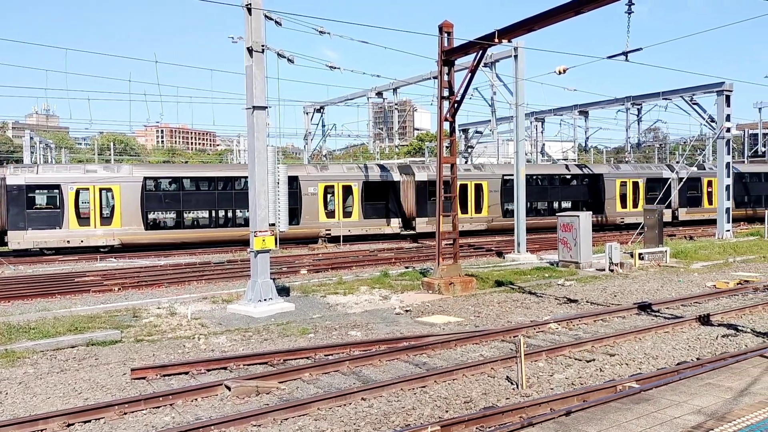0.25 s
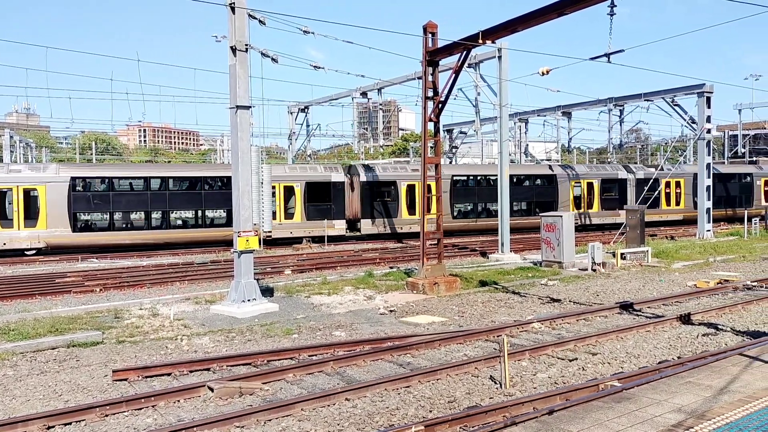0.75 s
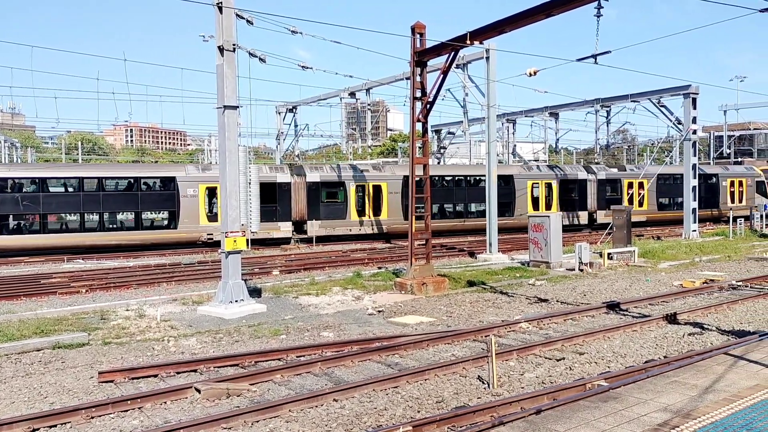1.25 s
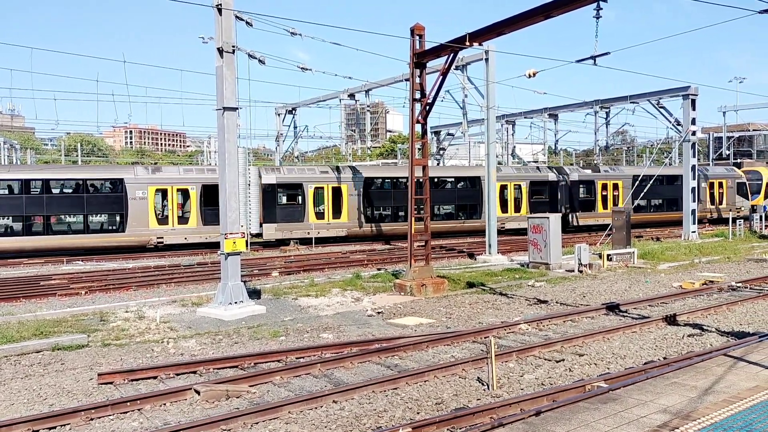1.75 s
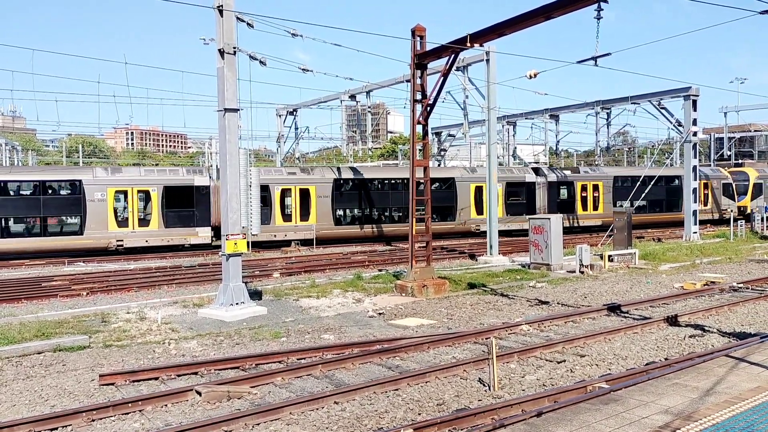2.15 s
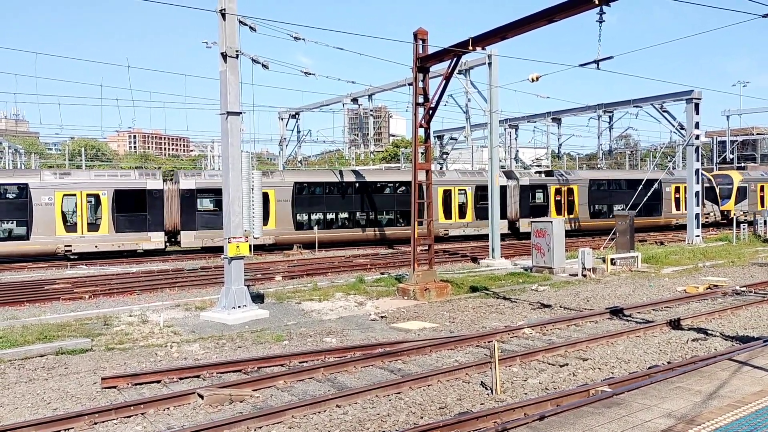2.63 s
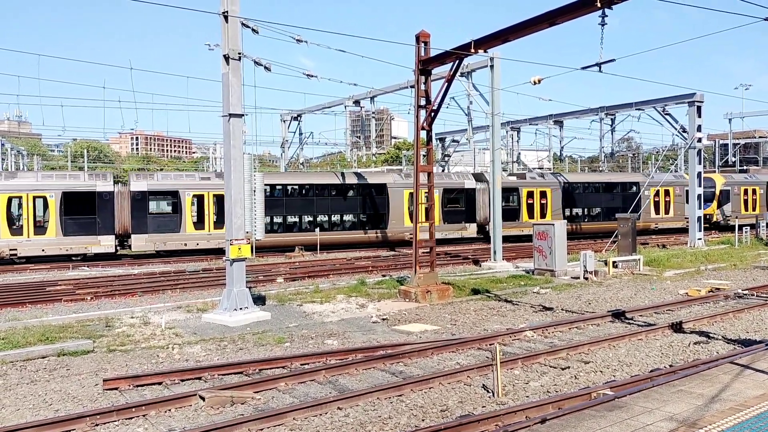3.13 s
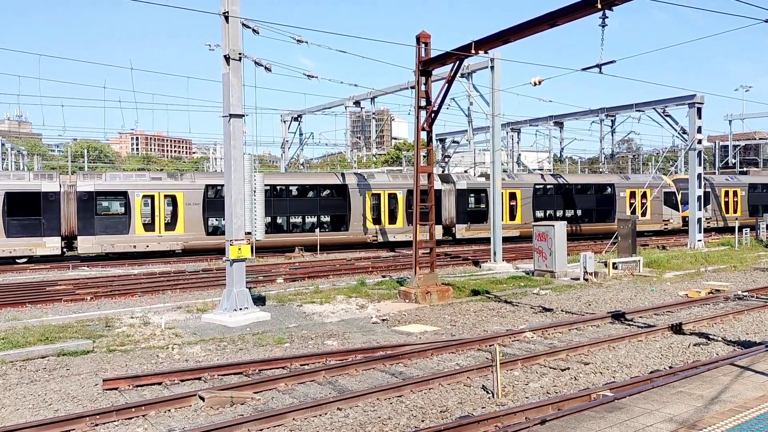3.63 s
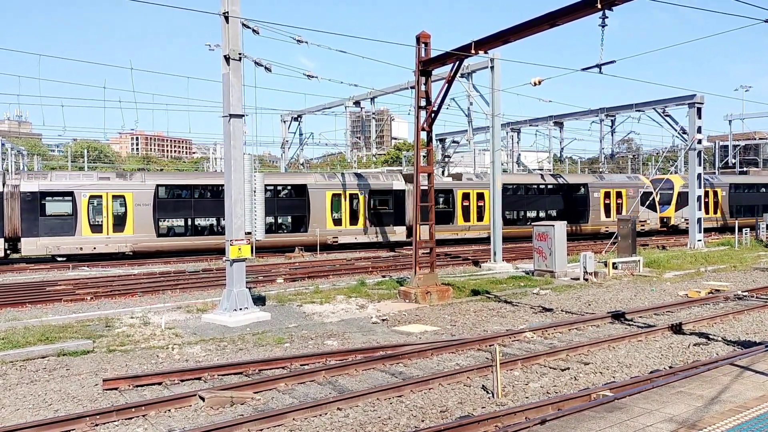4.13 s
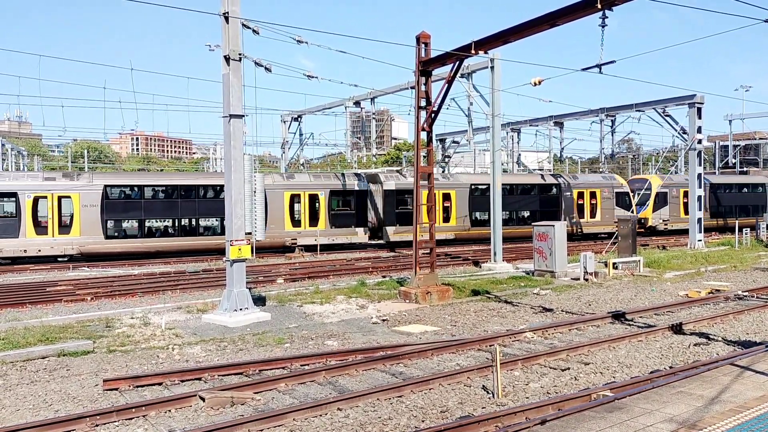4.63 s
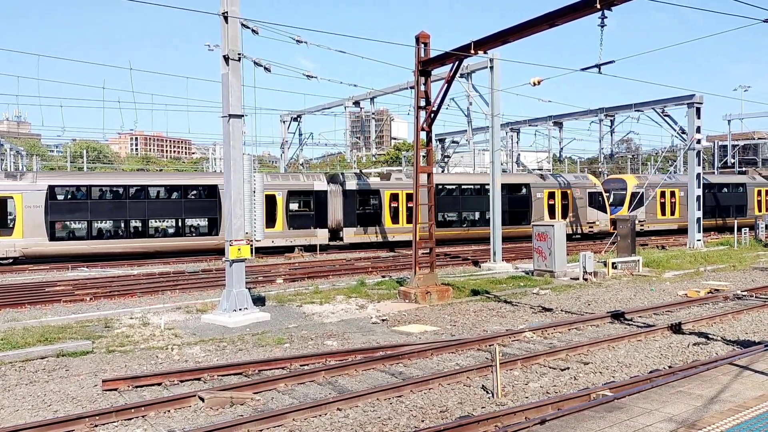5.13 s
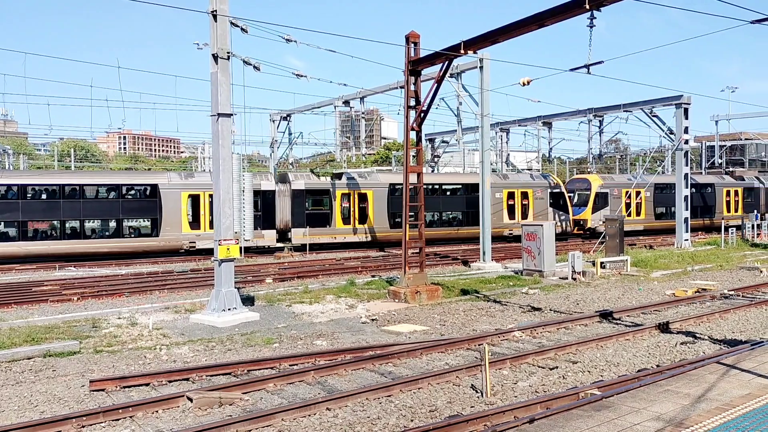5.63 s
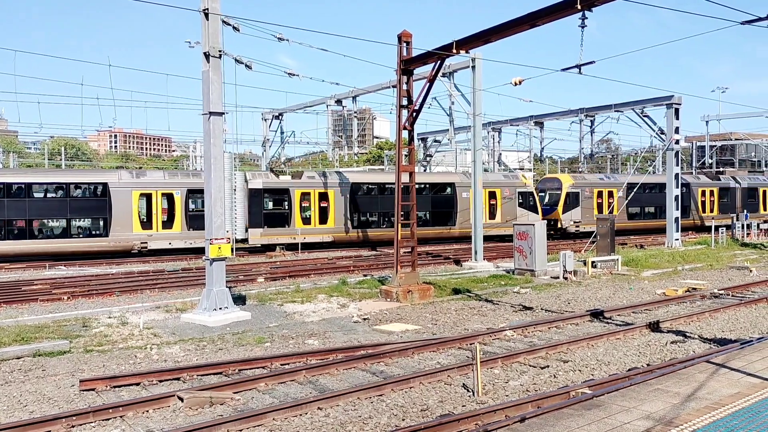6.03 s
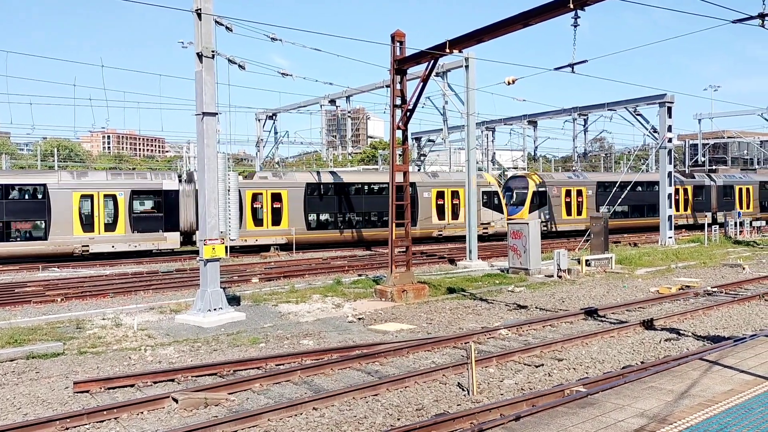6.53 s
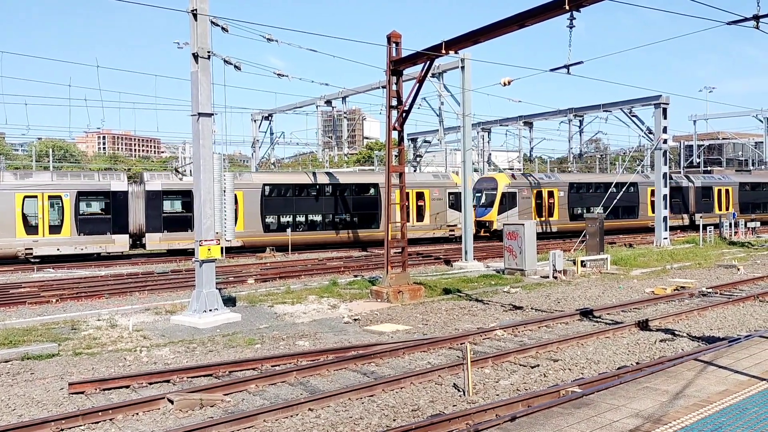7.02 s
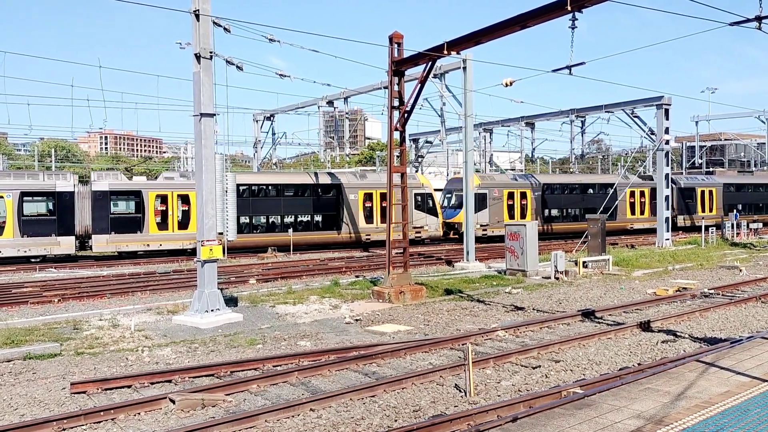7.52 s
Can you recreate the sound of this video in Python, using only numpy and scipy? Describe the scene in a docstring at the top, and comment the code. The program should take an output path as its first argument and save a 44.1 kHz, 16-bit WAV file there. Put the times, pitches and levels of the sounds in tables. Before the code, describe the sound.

Piercing metallic wheel squeals come and go over the low rumble and dull joint thumps of an electric train crossing a rail yard.

```python
"""Two wheels of an electric train squeal in turn through the curves of a rail yard, some way off.
Each squeal is a set of wandering stick-slip modes, some locking on louder and purer for a moment.
Flanges grind in shaped noise; a low moan and hum, and short gliding groans, come from wheel and cars.
Underneath, band-shaped noise rumbles and thumps over rail joints.
Close by, gusts of low noise buffet mostly the left microphone."""
import sys
import numpy as np
from scipy import signal
from scipy.io import wavfile
from scipy.ndimage import uniform_filter1d, minimum_filter1d

SR = 44100
rng = np.random.default_rng(int(sys.argv[2]) if len(sys.argv) > 2 else 0)


def inscribe(sig):
    """Save sig as 16-bit PCM at rate SR to the path in sys.argv[1].

    A 1-D sig is mono; a 2-D sig holds one channel per row.
    Samples are clipped to [-1, 1] before scaling.
    """
    pcm = np.round(np.clip(np.atleast_2d(sig).T, -1, 1) * 32767)
    wavfile.write(sys.argv[1], SR, pcm.astype(np.int16))


N = 342657
TIME = np.arange(N) / SR
CONTROL_TIME = TIME[::32]  # coarser clock for slow envelopes
EDGE_HZ = 15750  # upper band limit at the microphones

# Pitches of each wheel's leading modes. Each entry: frequency in Hz.
FIRST_HZ = [3187, 4026, 4886, 5744, 6627, 9344]
SECOND_HZ = [4223, 5127, 6043, 6957, 7879, 10657]
# Share of each leading mode in its wheel's squeal. Each entry: relative level in dB.
FIRST_SHARE_DB = [-9.5, 2, 1, -1, 3.5, -15.5]
SECOND_SHARE_DB = [4, 1.5, -1.5, -5, -10.5, -14]
# Sound of the leading modes.
# Each row: line width in Hz before the skirt, roughness 0-1 when not locked, left-right balance in dB.
FIRST_LEAD = [(15.5, 0.84, -6), (8.4, 0.49, -5.5), (42.6, 0.8, -10), (34, 0.95, -8), (5.3, 0.73, -8),
              (8.25, 0.4, 5)]
SECOND_LEAD = [(21.8, 0.81, -3.5), (31.7, 0.97, -7), (34, 1, -10), (13.7, 0.41, -14), (11.6, 0.4, -26),
               (14, 0.41, -5)]
# Pitches of each wheel's weaker modes. Each entry: frequency in Hz.
FIRST_WEAK_HZ = [656, 865, 1694, 2374, 6400, 7520, 8425, 10285, 11213, 12102, 13103, 14018, 15003]
SECOND_WEAK_HZ = [2178, 2468, 3328, 6440, 8806, 9727, 11590, 12500, 13437, 14320, 14928, 15601]
# Sound of the weaker modes.
# Each row: line width in Hz before the skirt, relative level in dB, left-right balance in dB.
FIRST_WEAK = [(57.407, -25, -2), (64, -7.5, -5.5), (99.3, -6, -2.5), (44, -6, 3), (70, -8.5, -20),
              (11.4, -3.5, -32), (20, -12, 35), (24.3, -8.5, -13), (30, -14, 1), (30, -24, 2), (28, -42, 8),
              (30, -29, 10), (25, -29, 16)]
SECOND_WEAK = [(110, -8, 0), (40, -5, 0), (39.4, 0, 1), (70, -8, -21), (13.7, -11, 36), (14.2, -6.5, 3),
               (28, -20.5, 6), (25, -40, -2), (22, -35, 4), (30, -24, 17), (45, -21, 22), (35, -42, 24)]
# Each wheel's flange pressing on the rail. Each row: start in seconds, length in seconds, rise in seconds,
# squeal in dB, grind in dB, then low rasp and top fizz in dB against the grind; levels are relative.
FIRST_CONTACTS = [(-.1, 0.047, .03, -23.5, -22.5, -24, -12), (0.367, 0.049, .06, -52, -39.5, -8, -6),
                  (0.827, 0.28, 0.017, -29.5, -28.5, 1.5, 6.5), (1.374, 0.27, 0.065, -29, -29.5, 5.5, 12.5),
                  (1.964, 0.012, 0.012, -42.5, -34, -2.5, 7.5), (2.044, 0.047, .02, -36, -44, 2, 16),
                  (2.092, 0.017, 0.017, -29.5, -27.5, 4, 6), (2.186, 0.065, 0.061, -29.5, -24.5, 0.5, 1.5),
                  (2.56, .19, 0.13, -35.5, -34, 8.5, 3)]
SECOND_CONTACTS = [(2.45, 0.19, 0.054, -42.5, -32, -0.5, 6), (2.5, 0.23, 0.12, -30.5, -27.5, 3, 7.5),
                   (2.796, 0.16, 0.066, -36.5, -35.5, -4, 5), (3.034, 0.64, 0.19, -36, -31.5, 5.5, 4),
                   (3.468, .56, 0.19, -25.5, -20.5, -1.5, -2.5),
                   (4.068, 0.18, 0.054, -27, -22.5, -8.5, 2.5),
                   (4.343, 0.079, 0.06, -33.5, -26.5, -2.5, -3), (4.745, 0.63, 0.1, -25.5, -20.5, -2, 3),
                   (5.272, 0.45, 0.036, -22.5, -23.5, -4.5, 4), (5.755, 0.26, 0.023, -30, -27, 1.5, 2.5),
                   (6.056, 0.86, 0.1, -26.5, -24, -0.5, 0.5), (6.852, 1, .08, -32, -29.5, 4.5, 4)]
# One mode captures the stick-slip and sings out.
# Each row: start in seconds, length in seconds, mode in Hz, relative level in dB.
FIRST_LOCKS = [(-.1, 0.079, 4886, -21), (-.1, 0.14, 4026, -27.5), (.41, 0.08, 4886, -43),
               (0.824, 0.061, 3187, -26.5), (0.938, 0.17, 3187, -24), (0.93, 0.3, 4886, -25.5),
               (1.052, 0.049, 6627, -20), (1.388, 0.15, 3187, -25.5), (1.56, .15, 3187, -31),
               (1.484, 0.098, 6627, -17), (1.648, 0.071, 6627, -20), (1.507, .09, 9344, -31),
               (1.618, 0.059, 4026, -19.5), (2.092, 0.037, 3187, -25), (2.102, 0.26, 5744, -34),
               (2.204, .11, 4026, -28), (2.57, 0.14, 3187, -33.5), (2.715, 0.053, 4886, -27)]
SECOND_LOCKS = [(2.55, 0.26, 6043, -33), (2.577, 0.16, 4223, -38), (2.689, 0.06, 4223, -19.5),
                (2.852, 0.095, 4223, -30), (3.228, 0.32, 10657, -34.5), (3.144, 0.19, 4223, -30.5),
                (3.346, 0.24, 4223, -23), (3.598, 0.11, 4223, -22), (3.614, 0.39, 10657, -33),
                (3.7, 0.091, 6957, -34), (3.76, 0.46, 5127, -33), (3.8, 0.26, 4223, -21),
                (4.113, 0.23, 6957, -29), (4.142, 0.056, 6043, -20), (4.186, 0.15, 5127, -23),
                (4.455, 0.091, 6957, -39.5), (4.78, .1, 7879, -27.5), (4.785, 0.44, 6957, -21),
                (4.818, 0.25, 4223, -30), (4.973, 0.27, 4223, -25.5), (5.316, .15, 10657, -30),
                (5.34, .12, 5127, -23), (5.53, 0.093, 6043, -23.5), (5.635, 0.17, 4223, -22),
                (5.645, 0.28, 6957, -24), (6.195, .13, 4223, -25), (6.196, 0.63, 5127, -26),
                (6.502, 0.098, 6043, -23), (6.923, 0.4, 4223, -24.5), (6.85, 0.56, 10657, -43.5),
                (6.9, .2, 5127, -38), (7.323, 0.1, 5127, -27), (7.486, 0.053, 4223, -18)]
# The second wheel's lowest modes.
# Each row: frequency in Hz, line width in Hz before the skirt, roughness 0-1, left-right balance in dB.
MOAN_MODES = [(640, 44.6, 0.4, -3), (900, 43, 1, -3.5), (1786, 27.9, 1, -2.5)]
# Share of those lowest modes in the squeal. Each entry: relative level in dB.
MOAN_SHARE_DB = [-31.5, -16, -14.5]
# Side load flexing the second wheel's disc.
# Each row: centre in seconds, half length in seconds, then level in dB of each of the lowest modes.
SIDE_LOADS = [(3.97, 0.18, -38.5, -33, -48), (6.55, 0.92, -68, -61, -37.5)]
# Lead of the squeal and grinding at the left microphone over the right.
# Each row: time in seconds, lead in milliseconds.
LEAD_TIME = [(0, .35), (1.8, 0.47), (3.7, 0.48), (4.2, 0.39), (6, 0.375), (6.7, 0.46)]
# Colour of the grinding. Each row: frequency in Hz, relative density in dB per Hz.
GRIND_COLOUR = [(400, -23), (650, -20), (780, -8), (910, -4), (1100, -6.5), (1500, -7), (1900, -3.5),
                (3500, -1.5), (4700, 3.5), (6600, 0.5), (7500, -8), (9000, -17.5), (13000, -25),
                (15500, -42)]
# Place of the grinding between the microphones. Each row: frequency in Hz, left-right balance in dB.
GRIND_SIDE = [(900, -3), (2400, 1), (3400, -18.5), (4700, -16), (6600, -1), (8200, 1), (12500, -1.5),
              (14500, 23)]
# Colour of the rolling. Each row: frequency in Hz, relative density in dB per Hz.
ROLL_COLOUR = [(15, -26), (30, -17.5), (42, 4.5), (70, -6.5), (100, -0.5), (160, -8), (270, -9), (330, -18),
               (520, -27.5), (640, -21.5), (900, -26), (1300, -34.5), (3000, -38.5), (9000, -58.5)]
# Wheels dropping over rail joints. Each row: time in seconds, relative strength in dB.
JOINTS = [(0.317, -18), (1.124, -18.5), (1.188, -11), (1.68, -13), (2.469, -33), (2.545, -11),
          (3.045, -12.5), (5.447, -15), (5.966, -16), (6.764, -26), (6.841, -17), (7.349, -16.5)]
# Stray groans and squeaks from the cars.
# Each row: start in seconds, length in seconds, first pitch in Hz, last pitch in Hz (both before the
# waver), level in dB.
GROANS = [(0.544, 0.084, 4400, 4360, -52), (0.547, 0.056, 2360, 2340, -49), (0.676, 0.16, 2230, 1900, -51),
          (2.818, 0.3, 491, 454, -46), (3.346, 0.26, 210, 205, -33), (3.828, 0.21, 332, 317, -38.5),
          (7.624, 0.46, 215, 202, -29.5)]
# Gusts, strongest at the left microphone. Each row: centre in seconds, length in seconds, relative level in dB.
GUSTS = [(3.933, 0.17, -24), (4.095, 0.087, -15.5), (4.187, 0.051, -5.5), (4.282, 0.046, -6),
         (4.42, 0.16, -18.5), (4.9, 0.25, -21.5), (5.55, 0.64, -20.5), (5.729, 0.03, -12),
         (6.203, 0.25, -30)]
# Colour of the gusts. Each row: frequency in Hz, relative density in dB per Hz.
GUST_COLOUR = [(15, -9), (45, 5), (80, 2.5), (140, -1.5), (220, -10.5), (450, -31), (1200, -67),
               (4000, -85)]
# Likeness of the noise at the two microphones. Each row: frequency in Hz, likeness 0-1.
LIKENESS = [(40, 0.98), (250, 0.95), (600, 0.43), (3000, 0.77), (12000, 0.28)]

LOW_MODE_HZ = 3000  # weaker modes below this answer to the rasp of a contact
# how fast things die away once the flange lets go
RING_DB_PER_S, LOCK_DB_PER_S, GRIND_DB_PER_S, FIZZ_DB_PER_S = 60, 126, 90, 131
# relative levels of the treads' light scraping between contacts
SCRAPE_DB, SCRAPE_RASP_DB, SCRAPE_FIZZ_DB = -46.5, -50, -73
# the rumble ebbs as the train draws away, and swells while a bogie crosses a joint
ROLL_DB, ROLL_EBB_DB_PER_S, BOGIE_S, BOGIE_DB = -29.5, 0.38, 0.074, -13


def wheel(contacts, locks, pitches, shares_db, lead, weak_pitches, weak, lock_db, weak_db, weak_rough,
          lock_rise_s, surge_db, purity, rasp_share):
    """Every contact rings all the modes; now and then one locks on and sings louder and purer."""
    drive = squeal(contacts)
    locked = np.zeros((len(pitches), len(CONTROL_TIME)))
    for start, length, hz, db in locks:
        nearest = np.argmin(abs(np.array(pitches) - hz))
        hold = press(CONTROL_TIME, start, length, lock_rise_s, LOCK_DB_PER_S)
        locked[nearest] += gain_of(db + lock_db) * hold

    total = 0
    for hz, db, lock, (width, rough, side) in zip(pitches, shares_db, locked, lead):
        lock = np.interp(TIME, CONTROL_TIME, lock)
        level = np.hypot(drive * gain_of(db) * surge(surge_db), lock)
        lock_share = (lock / (level + 1e-12)) ** 2
        total = total + level * wheel_mode(hz, width, rough * (1 - purity * lock_share), side)

    rasping = squeal(contacts, rasp_share)
    for hz, (width, db, side) in zip(weak_pitches, weak):
        push = rasping if hz < LOW_MODE_HZ else drive
        level = push * gain_of(db + weak_db) * surge()
        total = total + level * wheel_mode(hz, width, weak_rough, side)
    return total


def squeal(contacts, rasp_share=0):
    """How strongly a wheel rings: its hardest contact rules, optionally with a share of the rasp."""
    pushes = []
    for start, length, rise, db, _, rasp_db, _ in contacts:
        push = press(CONTROL_TIME, start, length, rise, RING_DB_PER_S)
        pushes.append(gain_of(db + rasp_share * rasp_db) * push)
    return np.interp(TIME, CONTROL_TIME, np.max(pushes, axis=0))


def press(t, start, length, rise, fall_db_per_s):
    """Rise, hold and ring-down of one push on the rail."""
    u = np.clip((t - start) / rise, 0, 1)
    release = gain_of(-fall_db_per_s * np.maximum(t - start - length, 0))
    return np.sin(np.pi / 2 * u) ** 2 * release


def wheel_mode(hz, width_hz, rough, side_db, skirt_hz=110, apart=0.77):
    """One wheel mode: a held stick-slip tone of wandering phase, plus ringing driven by random slips."""
    t = np.arange(0, N / SR + .01, 1 / 2000)  # the swing is worked out at 2 kHz
    step = t[1]
    rough = np.interp(t, TIME, np.clip(rough, 0, 1) * np.ones(N))
    apart = np.clip(apart, 0, 1)

    phase = np.cumsum(rng.standard_normal(len(t))) * np.sqrt(np.pi * width_hz * step)
    held = np.exp(1j * phase)
    slips = rng.standard_normal((3, len(t))) + 1j * rng.standard_normal((3, len(t)))
    ring = evened(signal.lfilter([1], [1, -np.exp(-np.pi * width_hz * step)], slips))
    # scattering in the yard gives each microphone some ringing of its own
    ringing = np.sqrt(1 - apart) * ring[0] + np.sqrt(apart) * ring[1:]
    swing = np.sqrt(1 - rough) * held + np.sqrt(rough) * ringing
    # the skirt: a low-pass on the swing thins the sound far from the mode's pitch
    swing = signal.lfilter([1], [1, -np.exp(-2 * np.pi * skirt_hz * step)], swing)
    # friction saturates, so the swing flutters quickly but holds its mean strength
    swing /= np.sqrt(uniform_filter1d(np.mean(abs(swing) ** 2, axis=0), size=160))
    # the right microphone hears the mode later, as a phase lag
    swing[1] *= np.exp(-2j * np.pi * hz * curves(LEAD_TIME, t)[0] / 1000)

    carrier = np.sqrt(2) * np.exp(2j * np.pi * hz * TIME)
    pair = np.array([(np.interp(TIME, t, s) * carrier).real for s in swing])
    return pair * sides(side_db)[:, None]


def surge(depth_db=4.5):
    """The slow rise and fall of a mode as the contact point wanders over the tread."""
    t = grid(size=2048)[0][:, 0]
    wander = np.interp(TIME, t, drift(len(t), size=12))
    return evened(gain_of(depth_db * wander))


def moan():
    """The second wheel's disc flexes in its lowest modes under the squeal and under side load."""
    levels = gain_of(MOAN_SHARE_DB)[:, None] * squeal(SECOND_CONTACTS)
    for centre, half_length, *dbs in SIDE_LOADS:
        load = np.exp(-((TIME - centre) / half_length) ** 2)
        levels = np.hypot(levels, gain_of(dbs)[:, None] * load)
    return sum(level * wheel_mode(*mode) for level, mode in zip(levels, MOAN_MODES))


def grinding(level_db=-1.0, chatter_db=0.5, patchy_db=2.5, grain_db=1.5, ripple_db=3.5, low_follow=0.12):
    """Steel rubbing on steel: a chattering rasp through the many dense modes of rail and bogie."""
    t, hz = grid(size=512)
    force_db, rasp_db, fizz_db = flange_force(t)
    colour = gain_of(read(GRIND_COLOUR, hz))
    colour /= np.linalg.norm(colour[(hz > 3400) & (hz < 7400)])  # unit power in the main band
    rasp_weight = read([(1100, 0.19), (1700, 0.49), (2700, 0.74), (3800, 0.051)], hz)
    fizz_weight = read([(6700, 0.023), (8500, 1)], hz)
    field_db = force_db + rasp_db * rasp_weight + fizz_db * fizz_weight

    # the heavy low modes answer the force slowly and only in part
    slow_db = uniform_filter1d(force_db, size=50, axis=0)
    slow_db = slow_db.mean() + low_follow * (slow_db - slow_db.mean())
    field_db = field_db + (slow_db - force_db) * read([(1000, 0.95), (1700, 0.26)], hz)

    patches = evened(uniform_filter1d(drift(field_db.shape, size=9), size=4, axis=1))
    grains = evened(uniform_filter1d(rng.standard_normal(field_db.shape), size=30, axis=1))
    ripple = drift(field_db.shape, size=60)  # single modes stand out for a while
    field_db = field_db + chatter_db * drift(t.shape, size=6) + patchy_db * patches
    field_db = field_db + grain_db * grains + ripple_db * ripple

    z = noise_pair(t, hz) * colour * gain_of(field_db + level_db) * sides(read(GRIND_SIDE, hz))[:, None]
    # later at the right microphone
    z[1] *= np.exp(-2j * np.pi * hz * curves(LEAD_TIME, t)[0] / 1000)
    return to_sound(z, size=512)


def flange_force(t, bite_db=6, bite_s=0.19):
    """Levels in dB of the grinding, its rasp and its fizz; each contact bites brightly at first."""
    force, rasp, fizz = gain_of(SCRAPE_DB), gain_of(SCRAPE_RASP_DB), gain_of(SCRAPE_FIZZ_DB)
    for start, length, rise, _, db, rasp_db, fizz_db in FIRST_CONTACTS + SECOND_CONTACTS:
        push = press(t, start, length, rise, GRIND_DB_PER_S)
        fizz_push = press(t, start, length, rise, FIZZ_DB_PER_S)
        bite = bite_db * np.exp(-np.maximum(t - start, 0) / bite_s)
        force = np.maximum(force, gain_of(db) * push)
        rasp = np.maximum(rasp, gain_of(db + rasp_db) * push)
        fizz = np.maximum(fizz, gain_of(db + fizz_db + bite) * fizz_push)
    # rasp and fizz are given against the grinding
    return 20 * np.log10([force, rasp / force, fizz / force])


def rolling(patchy_db=3.0, side_db=0.0):
    """The low rumble of the cars: patchy coloured noise, swelling as each bogie passes."""
    t, hz = grid(size=4096)
    colour = gain_of(read(ROLL_COLOUR, hz))
    colour /= np.linalg.norm(colour)
    patches = evened(uniform_filter1d(drift((len(t), len(hz)), size=8), size=3, axis=1))
    z = noise_pair(t, hz) * colour * gain_of(patchy_db * patches)
    return to_sound(z, size=4096) * roll_level() * sides(side_db)[:, None]


def roll_level():
    """Strength of the rumble: a slow ebb, with a swell around every rail joint."""
    ebb = gain_of(ROLL_DB - ROLL_EBB_DB_PER_S * TIME)
    swell_power = sum(gain_of(db + BOGIE_DB) ** 2 * np.exp(-((TIME - s) / BOGIE_S) ** 2)
                      for s, db in JOINTS)
    return np.sqrt(ebb ** 2 + swell_power)


def joints(level_db=-5, rise=0.005, low_hz=38, high_hz=220, tail_db=-13, tail_t60=0.19):
    """Each joint gives a short dull thud, after which the car body shudders."""
    blows = np.zeros(N)
    for s, db in JOINTS:
        age = np.maximum(TIME - s, 0)
        u = age / rise
        thud = u * np.exp(1 - u)
        shudder = (1 - np.exp(-u)) * gain_of(tail_db) * np.exp(-np.log(1000) * age / tail_t60)
        blows += gain_of(db) * (thud + shudder)
    band = signal.butter(4, [low_hz, high_hz], "band", fs=SR, output="sos")
    body = signal.hilbert(signal.sosfilt(band, rng.standard_normal(N)))
    body /= np.sqrt(uniform_filter1d(abs(body) ** 2, size=900) / 2)  # steady strength
    return gain_of(level_db) * blows * body.real


def hum(hz=258, width_hz=28, level_db=-37, nearest_s=1.7, span_s=0.73, far_db=-45):
    """A wavering low hum from the cars that swells as its source goes by."""
    passing = gain_of(level_db) / np.hypot(1, (TIME - nearest_s) / span_s)
    level = np.hypot(gain_of(far_db), passing)
    return level * wheel_mode(hz, width_hz, rough=0.7, side_db=0, apart=.1)


def groans(level_db=0, waver=0.016):
    """Short rubbing tones that sag in pitch as the parts slide."""
    out = np.zeros(N)
    wobble = 1 + waver * drift(N, size=300)
    for s, length, first_hz, last_hz, db in GROANS:
        u = np.clip((TIME - s) / length, 0, 1)
        turns = np.cumsum((first_hz + (last_hz - first_hz) * u) * wobble) / SR
        swell = np.sqrt(2) * np.sin(np.pi * u)
        out += gain_of(db + level_db) * swell * np.sin(2 * np.pi * turns)
    return out


def breeze(level_db=-1, right_db=-20):
    """Lumps of turbulence, as low coloured noise, that mostly strike the left microphone."""
    t, hz = grid(size=2048)
    air = to_sound(noise_pair(t, hz) * gain_of(read(GUST_COLOUR, hz)), size=2048)
    air /= np.sqrt(uniform_filter1d(air ** 2, size=3000))  # steady strength
    push = sum(gain_of(db) * np.exp(-(2 * (TIME - s) / length) ** 2) for s, length, db in GUSTS)
    return air * push * gain_of([[level_db], [right_db]])


def noise_pair(t, hz):
    """Random short-time spectra for two partly alike microphones."""
    a, b, c, d = rng.standard_normal((4, len(t), len(hz)))
    same = np.clip(read(LIKENESS, hz), 0, 1)
    left = a + 1j * b
    right = same * left + np.sqrt(1 - same ** 2) * (c + 1j * d)
    return np.array([left, right])


def grid(size):
    """Times (a column) and frequencies of short-time spectra."""
    hop = size // 4
    return np.arange(N // hop + 5)[:, None] * hop / SR, np.fft.rfftfreq(size, 1 / SR)


def to_sound(z, size):
    """Short-time spectra to sound; the squared gains of the bins add up to its power."""
    _, sound = signal.istft(z, nperseg=size, noverlap=size * 3 // 4, time_axis=-2, freq_axis=-1)
    return sound[..., :N] * np.sqrt(3 / 2)


def drift(shape, size):
    """Smooth chance of unit spread: noise averaged twice along time."""
    once = uniform_filter1d(rng.standard_normal(shape), size, 0)
    return evened(uniform_filter1d(once, size, 0))


def sides(db):
    """Gains of the left and right microphones, of equal total power."""
    pair = np.array([gain_of(db / 2), gain_of(-db / 2)])
    return pair / np.sqrt(np.mean(pair ** 2, axis=0))


def read(points, hz):
    """Reads a spectrum on a log-frequency axis."""
    f, value = np.transpose(points)
    return np.interp(np.log(hz + 1), np.log(f + 1), value)


def curves(rows, t):
    """Reads every column of a curve table at the times t."""
    s, *columns = np.transpose(rows)
    return np.array([np.interp(t, s, c) for c in columns])


def evened(x):
    """Scales to a mean power of one."""
    return x / np.sqrt(np.mean(abs(x) ** 2) + 1e-20)


def gain_of(db):
    """Decibels to a factor."""
    return 10 ** (np.asarray(db) / 20)


def scene():
    """Both squealing wheels over the moan, the grinding, the sounds of the cars and the breeze."""
    first = wheel(FIRST_CONTACTS, FIRST_LOCKS, FIRST_HZ, FIRST_SHARE_DB, FIRST_LEAD, FIRST_WEAK_HZ, FIRST_WEAK,
                  lock_db=3, weak_db=-3.5, weak_rough=0.32, lock_rise_s=0.036,
                  surge_db=3.7, purity=0.15, rasp_share=0.4)
    second = wheel(SECOND_CONTACTS, SECOND_LOCKS, SECOND_HZ, SECOND_SHARE_DB, SECOND_LEAD,
                   SECOND_WEAK_HZ, SECOND_WEAK,
                   lock_db=3, weak_db=-4, weak_rough=0.42, lock_rise_s=.06,
                   surge_db=2.26, purity=0.12, rasp_share=0.27)
    train = first + second + moan() + grinding() + rolling() + joints() + hum() + groans()
    return train + breeze()


def record(dry, ceiling=1.0):
    """A fast limiter eases peaks under full scale; then a low-pass sets the band limit."""
    room = np.minimum(1, min(ceiling, 1) / (abs(dry).max(0) + 1e-9))
    limited = dry * uniform_filter1d(minimum_filter1d(room, size=181), size=181)
    low_pass = signal.firwin(511, EDGE_HZ, window=("kaiser", 9), fs=SR)
    return signal.oaconvolve(limited, low_pass[None], "same")


dry = scene()
out = record(dry)
inscribe(out)
```